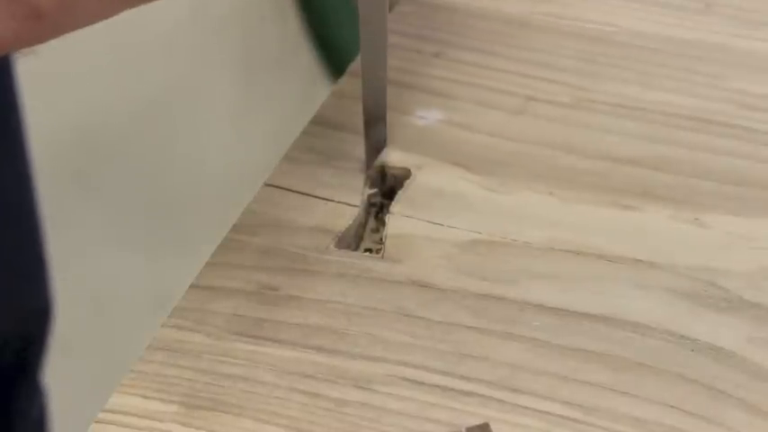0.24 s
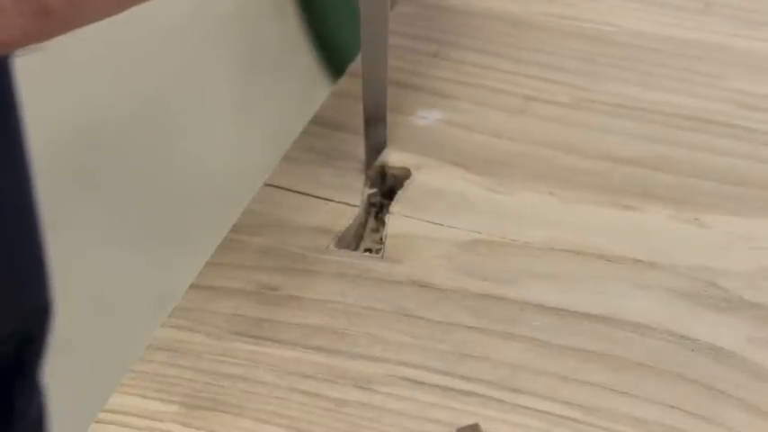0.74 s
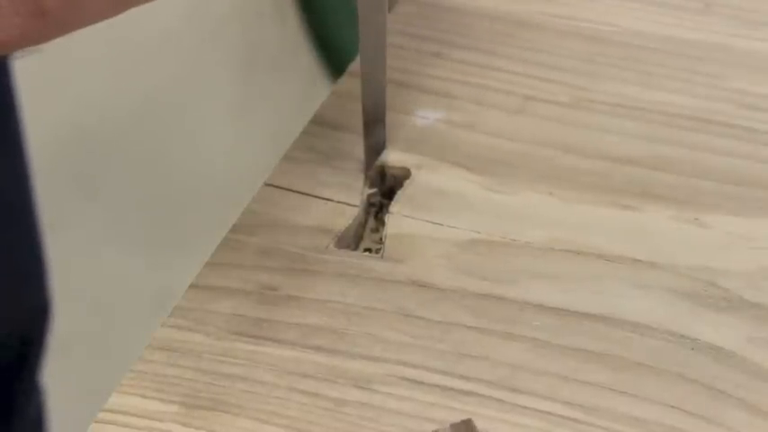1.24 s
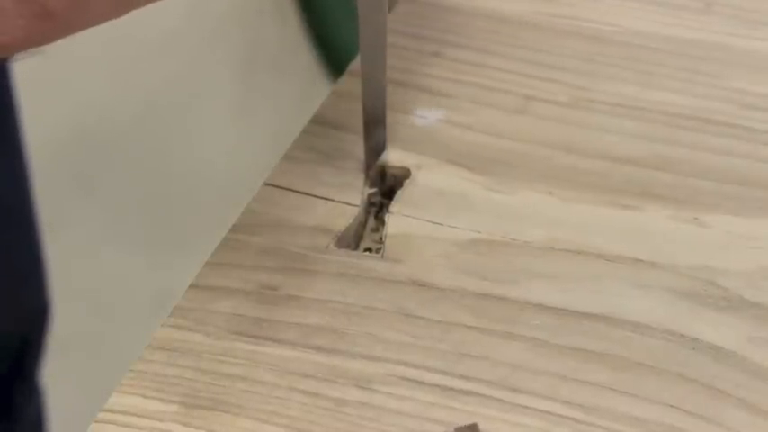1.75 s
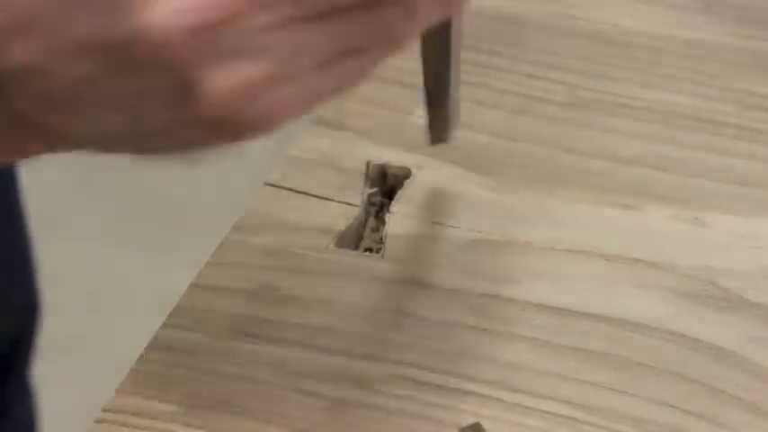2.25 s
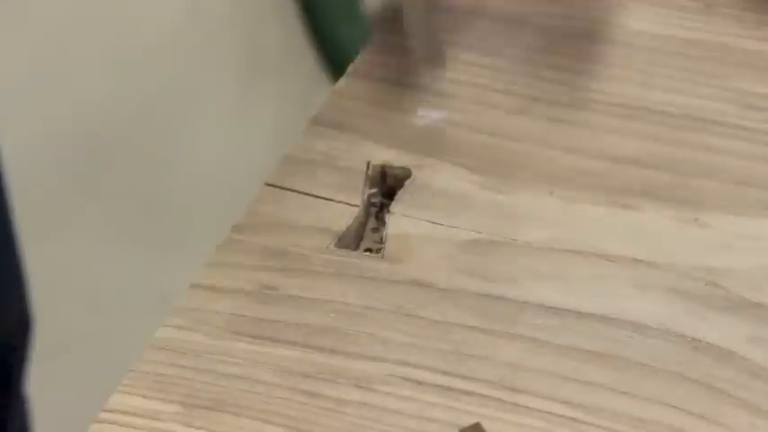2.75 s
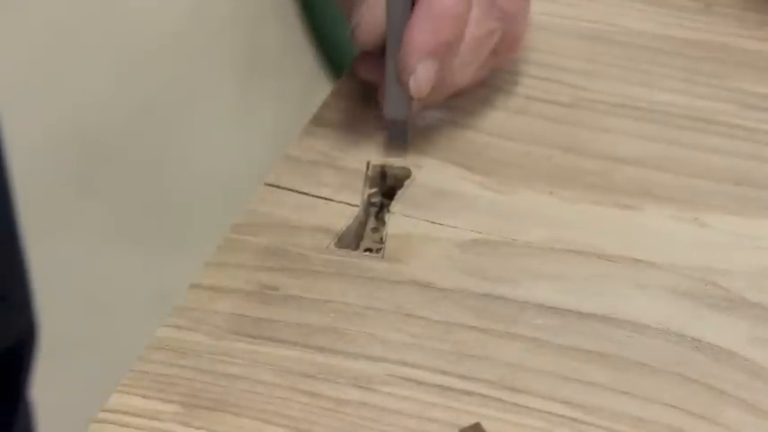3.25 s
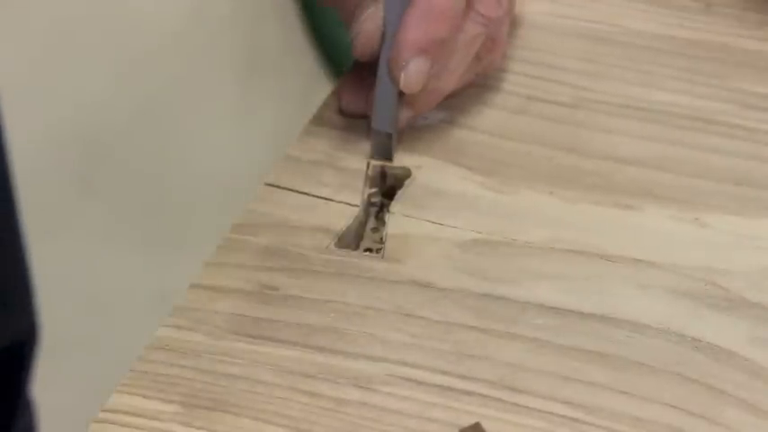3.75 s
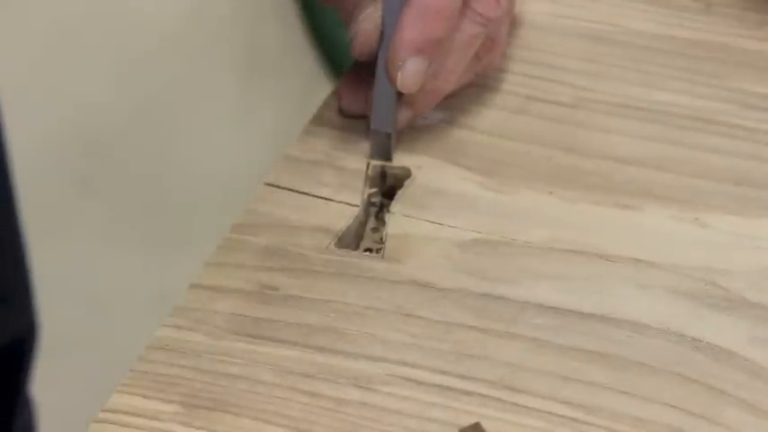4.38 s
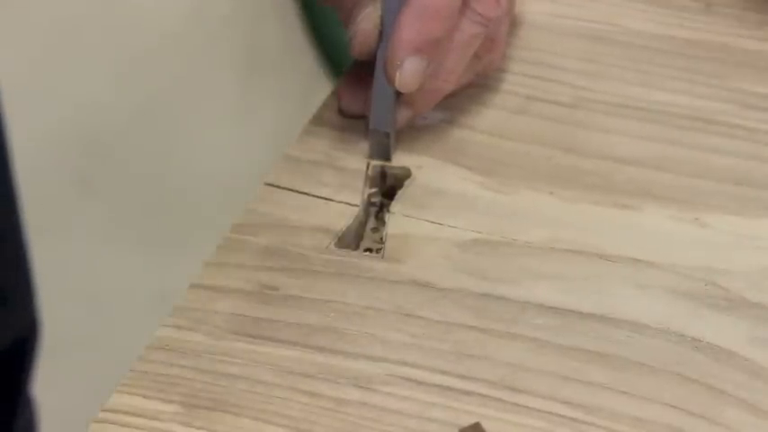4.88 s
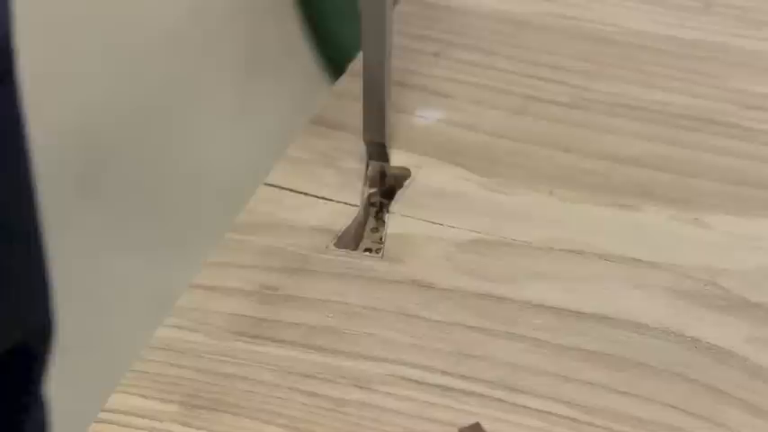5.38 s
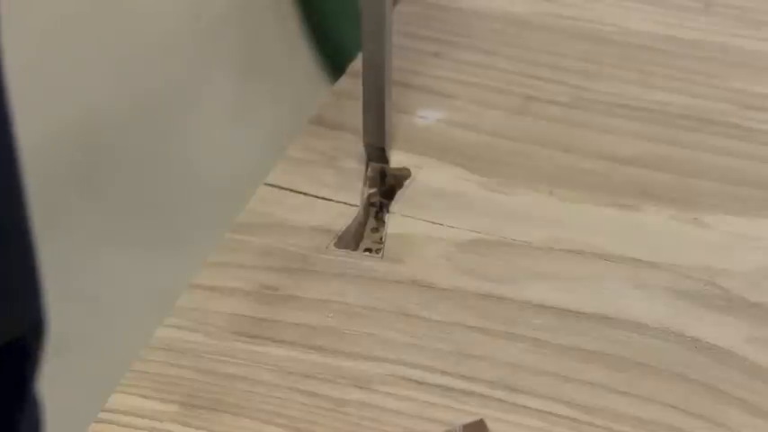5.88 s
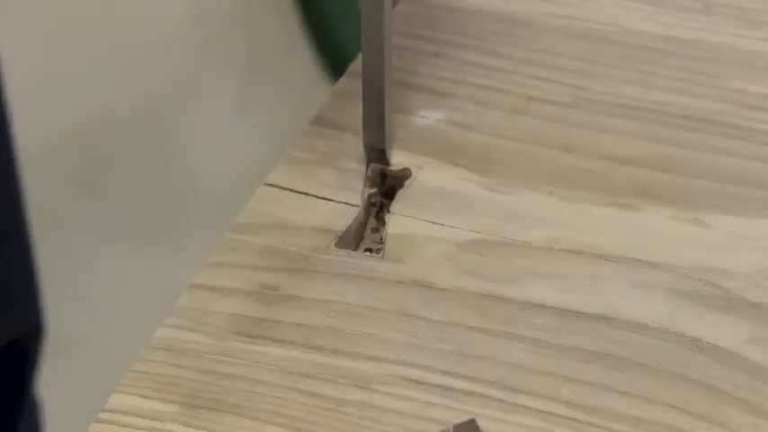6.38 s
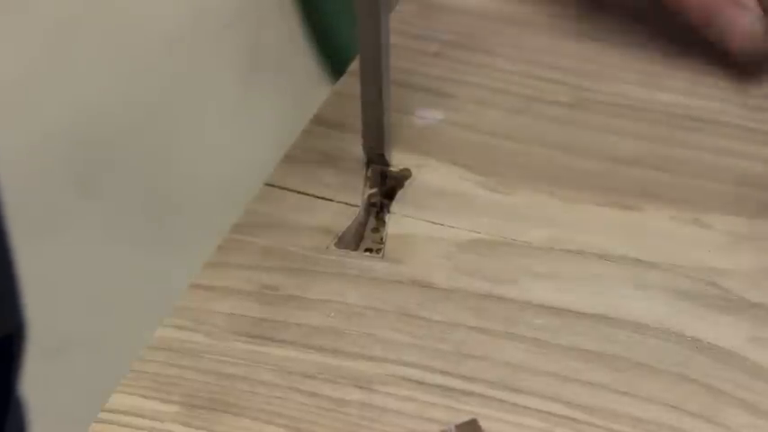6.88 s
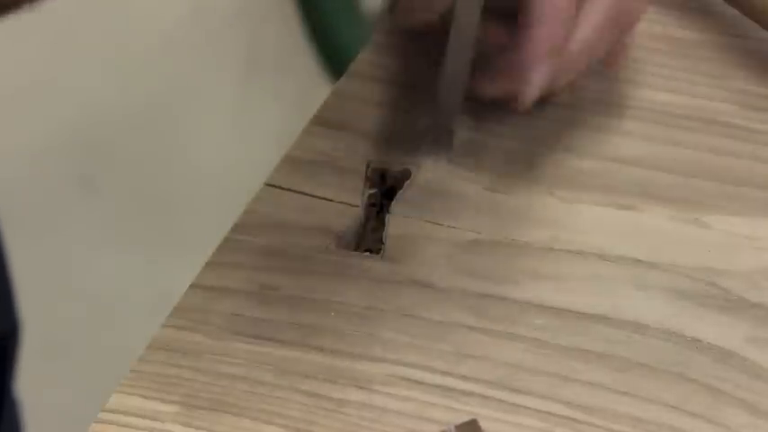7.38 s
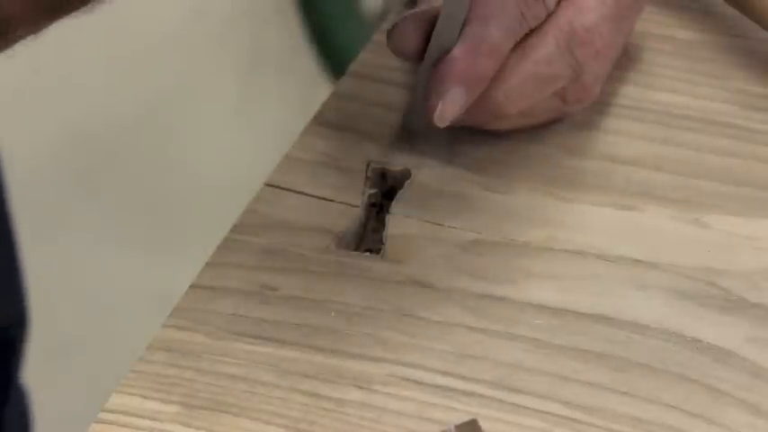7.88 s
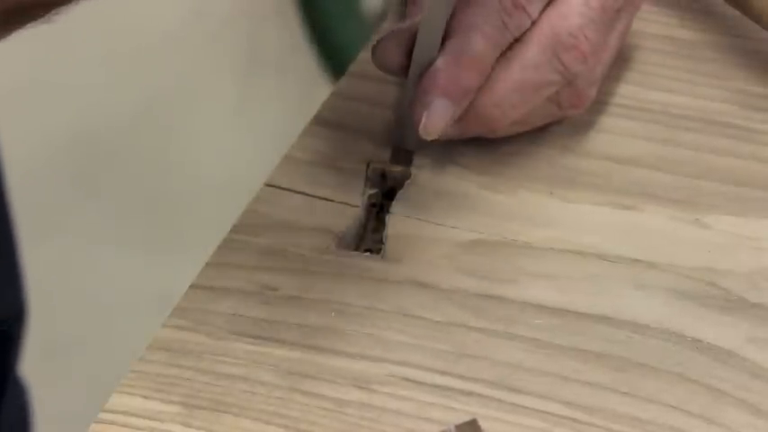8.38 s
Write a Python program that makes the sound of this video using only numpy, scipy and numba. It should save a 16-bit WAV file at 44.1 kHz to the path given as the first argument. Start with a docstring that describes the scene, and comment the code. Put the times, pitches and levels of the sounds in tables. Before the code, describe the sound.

A close microphone in a reverberant workshop, with soft low air noise and a faint steady machine hum throughout. From about 0.35 s to 1.86 s a mallet strikes a chisel six times, evenly, roughly 0.3 s apart: short, hard woody knocks with a bench thump and crackling fibres, the first weaker, then louder and tighter. Peaks overload slightly, and the background ducks and creeps back. A faint skin rub at 2.3 s, then the mallet lands on the bench with a flat clack at 2.5 s. Near 3.4 s a very soft rub and bump as the edge is set down. Three leaner, brighter blows at 5.65, 5.95 and 6.2 s, the second with more steel ring. Slight rubs at 6.6 and 6.75 s, a duller mallet drop at 6.9 s and two quieter rocking knocks by 7.1 s. At 7.5 s a soft hand slide and tiny fingernail tick, then only room noise until about 8.6 s.

```python
"""A mortise is chopped on a workbench, close to the microphone: six mallet blows on a chisel, then the mallet drops.
A hand rubs the chisel and sets its edge down; three more blows follow, and the mallet drops again and rocks.
Last, the hand slides once more and a fingernail ticks; air noise and a faint machine hum run throughout.
Damped modes and shaped noise make the blows; echoes and a noise tail make the live workshop.
The microphone's gain control reacts late, so loud attacks overload; then it ducks and creeps back."""
import sys
import numpy as np
from scipy import signal
from scipy.fft import rfft, irfft, next_fast_len
from scipy.io import wavfile
from numba import njit

SR = 44100
rng = np.random.default_rng(int(sys.argv[2]) if len(sys.argv) > 2 else 0)


def log_audio(samples):
    """Write samples as a 16-bit WAV file to the path given in sys.argv[1]."""
    # one column per channel
    frames = np.atleast_2d(samples).T
    # limit to full scale, then quantise
    limited = np.clip(frames, -1, 1)
    pcm = np.round(limited * 32767).astype(np.int16)
    wavfile.write(sys.argv[1], SR, pcm)


N = 380569


def from_db(db):
    """Decibels to gain."""
    return 10 ** (np.asarray(db) / 20)


def rms_one(x):
    """Scale to unit rms."""
    return x / np.sqrt(np.mean(x ** 2) + 1e-20)


def unit_blow(x):
    """Scale a blow so that its energy equals 20 ms at rms 1."""
    return x / np.sqrt(np.sum(x ** 2) / (SR / 50) + 1e-20)


def at_hz(points, hz):
    """Read a curve of (Hz, value) points on a log-frequency axis."""
    point_hz, value = np.transpose(points)
    return np.interp(np.log(np.maximum(hz, 1)), np.log(point_hz), value)


def low_pass(x, hz, order=2):
    """Causal Butterworth low-pass."""
    return signal.sosfilt(signal.butter(order, min(hz, SR / 2 - 1000), fs=SR, output="sos"), x)


def add(track, start_s, sound):
    """Mix a sound into a track at a time."""
    at = round(start_s * SR)
    track[..., at:at + sound.shape[-1]] += sound[..., :track.shape[-1] - at]


def coloured(spectrum, size):
    """Noise of a given spectrum, rms 1."""
    n = next_fast_len(size)
    hz = np.arange(n // 2 + 1) * SR / n
    shaped = rfft(rng.standard_normal(n)) * from_db(at_hz(spectrum, hz))
    return rms_one(irfft(shaped, n)[:size])


def burst(spectrum, t60):
    """Coloured noise that starts at once and dies away by 60 dB in t60 seconds."""
    t = np.arange(SR // 2) / SR
    return unit_blow(coloured(spectrum, len(t)) * from_db(-60 * t / t60))


def snap(spectrum, size=4096):
    """The shortest causal pulse with a given spectrum (minimum phase, from the folded cepstrum)."""
    hz = np.arange(size // 2 + 1) * SR / size
    cepstrum = irfft(np.log(from_db(at_hz(spectrum, hz))))
    cepstrum[1:size // 2] *= 2
    cepstrum[size // 2 + 1:] = 0
    pulse = irfft(np.exp(rfft(cepstrum)))
    return unit_blow(np.pad(pulse, (0, SR // 2 - size)))


def ring(modes, extra_db):
    """Damped sines; neighbouring modes start in opposite directions."""
    hz, db, t60 = np.transpose(modes)[:, :, None]
    t = np.arange(SR // 2) / SR
    sines = np.sin(2 * np.pi * hz * t) * from_db(db - 60 * t / t60)
    gains = (-1.) ** np.arange(len(modes)) * from_db(extra_db)
    return gains @ sines


def wood(modes, knock, contact_hz, bench_db, board_hz, board_db, knock_db, knock_t60,
         bench_hz=320, scatter_db=1.5, modes_far_db=-7):
    """One wooden blow as two rows: what the near microphone gets, and what goes out into the room."""
    def seating(hz):
        """Level in dB that the bench and the board's resonance add around their frequencies."""
        bench = bench_db * np.exp(-(1.1 * np.log2(hz / bench_hz)) ** 2)
        board = board_db * np.exp(-(3.5 * np.log2(hz / board_hz)) ** 2)
        return bench + board

    mode_hz = np.array(modes)[:, 0]
    body = unit_blow(ring(modes, seating(mode_hz) + scatter_db * rng.standard_normal(len(mode_hz))))
    grid_hz = np.geomspace(60, 16000, 100)
    colour = np.column_stack([grid_hz, at_hz(knock, grid_hz) + seating(grid_hz)])
    near = body + from_db(knock_db) * burst(colour, knock_t60)
    # the room takes sound from every face of the bench, so single modes stand out less there
    far = from_db(modes_far_db) * body + snap(colour)
    # a longer contact dulls both
    return np.array([unit_blow(low_pass(x, contact_hz, order=3)) for x in (near, far)])


# mallet blows on the chisel: start_s, level_db, bench_thump_db, handle_ring_db, blade_ring_db, fibre_cutoff_hz
CHISEL_BLOWS = [(0.3522, 3.5, 0.5, -22, -6, 8150), (0.6524, 8, 7, -11, -10, 8300),
                (0.964, 9.5, 7.5, -13, -13, 8000), (1.263, 10, 6.5, -15.5, -22, 9000),
                (1.567, 11.5, 5.5, -16.5, -9, 8500), (1.8626, 12, 5, -14.5, -10, 8400),
                (5.6571, 6, -5, -13, -4, 8040), (5.9404, 6.5, -5.5, -8.5, 6, 15000),
                (6.2145, 3, -2, -11.5, -10, 13620)]
# each run of blows drives one cut; at its first blow: board_resonance_hz, board_resonance_db, splitting_db
CUT_STARTS = [(1030, 5.5, -28.5), (830, 3.5, -25.5)]
# board and bench ringing together: pitch_hz, level_db, t60_s
BOARD_RING = [(180.6, -11.5, 0.12), (280, -11, 0.073), (344.3, -0.5, 0.17), (390, -10.5, .06),
              (494.2, -8.5, 0.077), (511, -3.5, 0.13), (585, -5.5, 0.076), (653, -4, 0.095),
              (710, -10.5, 0.033), (801.6, 0.5, 0.075), (943, -7, 0.23), (1039, 0, 0.04),
              (1077.5, -2.5, 0.073), (1106, -1.5, 0.069), (1264, -9, 0.096), (1319, -8, 0.074),
              (1457, -5, .07), (1510, -6, 0.11), (1706, -6, 0.073), (1814, -1, 0.031), (1990, -9.5, 0.046)]
# the board's crowded, heavily damped modes and snapping fibres: pitch_hz, level_db_per_hz
BOARD_THUD = [(60, -30), (120, -14.5), (190, -2.5), (280, -5), (430, 4), (600, -3.5), (1000, -3),
              (1500, -4.5), (2100, -6), (2500, -9), (3500, -11.5), (4400, -13), (16000, -29.5)]
# the chisel's wooden handle: pitch_hz, level_db, t60_s
HANDLE_RING = [(2080, 7.5, 0.03), (2200, 4, 0.041), (2313, -1, .04), (2870, 2.5, .04), (2977, 3.5, .04),
               (3490, 3, .025), (3648, 9, 0.028), (5100, 2.5, .008)]
# the steel blade: pitch_hz, level_db, t60_s
BLADE_RING = [(5270, -35.5, 0.19), (5320, -33.5, .24), (5500, -40.5, .12), (7600, -39, 0.098),
              (10580, -40.5, .1)]
# snapping fibres: pitch_hz, level_db_per_hz
FIBRE_CRACKLE = [(100, -31), (1500, -9.5), (3500, -2), (4400, -2.5), (5400, 1), (7000, 0), (9500, 1),
                 (12000, -3.5), (15000, -3)]
PAUSE_S = 1   # a longer rest between blows starts a new cut
# every blow takes up a share of the edge's remaining play; wedged tight, the board rings higher
# and more fibres split
WEDGE_SHARE, TIGHT_BOARD_HZ, TIGHT_SPLIT_DB = .22, 1890, 11
# a harder blow makes a shorter, brighter contact: its cut-off at 0 dB, and the level that doubles it
CONTACT_HZ, CONTACT_DOUBLING_DB = 2350, 25.5


def chisel(handle_far_db=-5.0, split_far_db=3.0):
    """Each blow rings board, handle and blade while the edge splits fibres and wedges tighter; rows near and far."""
    out = np.zeros((2, N))
    blows = np.array(CHISEL_BLOWS)
    runs = np.split(blows, np.flatnonzero(np.diff(blows[:, 0]) > PAUSE_S) + 1)
    for run, (loose_hz, board_db, loose_split_db) in zip(runs, CUT_STARTS):
        for count, (start_s, level_db, bench_db, handle_db, blade_db, split_hz) in enumerate(run):
            wedged = 1 - (1 - WEDGE_SHARE) ** count
            board_hz = loose_hz + wedged * (TIGHT_BOARD_HZ - loose_hz)
            split_db = loose_split_db + wedged * TIGHT_SPLIT_DB
            contact_hz = CONTACT_HZ * 2 ** (level_db / CONTACT_DOUBLING_DB)
            thud = wood(BOARD_RING, BOARD_THUD, contact_hz, bench_db, board_hz, board_db,
                        knock_db=-7.0, knock_t60=0.059)
            handle = unit_blow(ring(HANDLE_RING, rng.standard_normal(len(HANDLE_RING))))
            # the gripping hand shades the handle from the room
            handle = from_db([[handle_db], [handle_db + handle_far_db]]) * handle
            blade = ring(BLADE_RING, blade_db)
            # fibres crackle for a moment close by and reach the room as one crack
            fibres = np.array([burst(FIBRE_CRACKLE, t60=.016), from_db(split_far_db) * snap(FIBRE_CRACKLE)])
            split = from_db(split_db) * low_pass(fibres, split_hz, order=4)
            add(out, start_s, from_db(level_db) * (thud + handle + blade + split))
    return out


# mallet landing on the bench and rocking: start_s, level_db, contact_cutoff_hz, bench_thump_db,
# board_resonance_hz, board_resonance_db, rattle_db
MALLET_LANDINGS = [(2.5, 7.5, 3200, -4.5, 1410, -0.5, -24), (6.9205, 4, 1750, 0.5, 1390, 2.5, -54),
                   (6.992, -10, 1480, 6, 1010, 6, -34), (7.095, -16, 1180, 5.5, 774, 6.5, -30.5)]
# mallet head on the bench top: pitch_hz, level_db, t60_s
MALLET_RING = [(290, -19, 0.066), (340, -15, 0.068), (456, -11.5, 0.049), (557, -17, .06), (630, -12, 0.07),
               (739, -10.5, 0.068), (870, -11, 0.071), (926, -7, .06), (1130, -10.5, 0.032),
               (1264, -4.5, .045), (1440, 3.5, 0.026), (1628, -3.5, .04), (1933, -3, 0.017),
               (2055, -7.5, 0.067), (2350, -14.5, .03), (2800, -16, .025), (3450, -4, 0.013),
               (4900, -3.5, .02)]
# the mallet's crowded, heavily damped modes: pitch_hz, level_db_per_hz
MALLET_THUD = [(60, -34.5), (130, -22.5), (200, -6.5), (300, -5), (450, 2.5), (700, 1), (1400, 0.5),
               (1800, -2.5), (2500, -1), (3400, -9), (5000, -8.5), (7000, -24), (16000, -27)]


def mallet_dropped():
    """The mallet head lands flat on the bench, the second time rocking to rest; rows near and far."""
    out = np.zeros((2, N))
    for start_s, level_db, contact_hz, bench_db, board_hz, board_db, rattle_db in MALLET_LANDINGS:
        thud = wood(MALLET_RING, MALLET_THUD, contact_hz, bench_db, board_hz, board_db,
                    knock_db=-5.5, knock_t60=.035)
        rattle = from_db(rattle_db) * low_pass(burst(FIBRE_CRACKLE, t60=0.025), hz=4484)
        add(out, start_s, from_db(level_db) * (thud + rattle))
    return out


# the edge is set down on the board by hand: start_s, level_db
EDGE_SET_DOWNS = [(3.388, -31.5)]
# a fingernail ticks on the chisel: start_s, level_db
NAIL_TICKS = [(7.517, -47)]
# the ring of a fingernail tick: pitch_hz, level_db, t60_s
NAIL_RING = [(2310, -2, .05), (4180, -7, 0.017), (4500, -3, 0.027), (7100, -5, .015)]


def handling():
    """The edge bumps softly on the board between cuts, and a fingernail rings the chisel; rows near and far."""
    out = np.zeros((2, N))
    for start_s, level_db in EDGE_SET_DOWNS:
        bump = wood(BOARD_RING, BOARD_THUD, contact_hz=750, bench_db=8.5, board_hz=223, board_db=5,
                    knock_db=-1.5, knock_t60=0.058)
        add(out, start_s, from_db(level_db) * bump)
    for start_s, level_db in NAIL_TICKS:
        add(out, start_s, ring(NAIL_RING, level_db))
    return out


# the hand slides along the chisel to change its grip: start_s, length_s, level_db
HAND_SLIDES = [(2.29, .09, -53.5), (3.35, .25, -66.5), (6.619, .07, -58.5), (6.758, 0.095, -59),
               (7.472, 0.27, -62)]
# skin rubbing on the chisel: pitch_hz, level_db_per_hz
SKIN_COLOUR = [(100, -31.5), (1000, -12.5), (1900, -9), (2400, 7.5), (3500, 3), (4400, 2.5), (5400, -5.5),
               (7000, -4), (10000, -10.5), (16000, -15.5)]
SLIDE_ATTACK_S, SLIDE_RELEASE_T60_S = 0.038, .8


def hand_rub():
    """Skin rubs on the chisel as coloured noise: each slide swells, holds and fades."""
    t = np.arange(N) / SR
    level = np.zeros(N)
    for start_s, length_s, level_db in HAND_SLIDES:
        swell = np.clip((t - start_s) / SLIDE_ATTACK_S, 0, 1)
        fade_db = -60 * np.maximum(t - start_s - length_s, 0) / SLIDE_RELEASE_T60_S
        level += swell * from_db(level_db + fade_db)
    return level * coloured(SKIN_COLOUR, N)


# how long the workshop rings, interpolated at each band's centre: pitch_hz, t60_s
WORKSHOP_T60 = [(100, 0.64), (220, 0.4272), (600, 0.5315), (1300, 0.58), (2600, 0.5122), (6000, 0.47),
                (10000, -0.06), (16000, 0.4)]
# colour of the reverberation, before its overall level: pitch_hz, level_db
WORKSHOP_COLOUR = [(60, -12.5), (120, -5), (175, 5), (270, -1.5), (420, -0.5), (620, -1), (1200, -2),
                   (2300, -3.5), (3700, -5), (6000, -2.5), (10000, 0), (15000, -4)]
# bench top, floor and ceiling echoes: delay_s, level_db
WORKSHOP_ECHOES = [(.0068, -9), (0.0105, -6.5), (0.0248, -11.5)]


def workshop(near, far, wet_db, build_s, echo_cut_hz):
    """Direct sound, a few dull echoes and a diffuse tail that dies band by band."""
    t = np.arange(SR) / SR
    edges_hz = np.geomspace(50, 18000, 18)
    tail, echoes = np.zeros((2, SR))
    for low, high in zip(edges_hz, edges_hz[1:]):
        centre_hz = np.sqrt(low * high)
        band_filter = signal.butter(2, [low, high], "band", fs=SR, output="sos")
        band = signal.sosfilt(band_filter, rng.standard_normal(SR))
        decay_db = -60 * t / at_hz(WORKSHOP_T60, centre_hz)
        tail += band * from_db(at_hz(WORKSHOP_COLOUR, centre_hz) + decay_db)
    tail *= from_db(wet_db) * (1 - np.exp(-t / build_s))
    for delay_s, level_db in WORKSHOP_ECHOES:
        add(echoes, delay_s, from_db([level_db]))
    echoed = low_pass(signal.fftconvolve(near, echoes)[:N], echo_cut_hz)
    reverberation = signal.fftconvolve(far, tail)[:N]
    return near + echoed + reverberation


# air noise in the workshop: pitch_hz, level_db_per_hz
AIR_COLOUR = [(25, -9), (50, -2.5), (90, -2), (160, -6.5), (260, 1.5), (370, -2), (470, -3.5), (560, -5),
              (850, -5), (1300, -10.5), (2200, -17.5), (5000, -23), (10000, -28), (15500, -27)]
AIR_DB = -48   # rms
# partials of the machine hum: pitch_hz, rms_level_db
MACHINE_HUM = [(360.5, -54.5), (450.6, -55.5), (479.5, -62.5), (600, -60.5), (904, -66)]


def background(waver=0.27):
    """Air noise and a machine's hum, each partial wavering as its phase walks at random (rad per step)."""
    t = np.arange(N) / SR
    knots_s = np.linspace(0, N / SR, 40)
    hum = np.zeros(N)
    for hz, level_db in MACHINE_HUM:
        drift = np.interp(t, knots_s, np.cumsum(rng.normal(0, waver, len(knots_s))))
        hum += from_db(level_db) * np.sqrt(2) * np.sin(2 * np.pi * hz * t + drift)
    return from_db(AIR_DB) * coloured(AIR_COLOUR, N) + hum


def scene():
    """Blows and handling in the workshop, with the close hand rub, over the background."""
    near, far = chisel() + mallet_dropped() + handling()
    in_room = workshop(near, far, wet_db=-35.5, build_s=.008, echo_cut_hz=3100)
    return (in_room + hand_rub() + background())[None]


@njit
def ducking(over_db, attack, release):
    """Gain reduction in dB: it chases any excess level and falls back at a steady rate."""
    out, held = np.zeros(len(over_db)), 0.
    for i in range(len(over_db)):
        held = max(held + attack * max(over_db[i] - held, 0.) - release, 0.)
        out[i] = held
    return out


CUTOFF_HZ = 16000   # top of the microphone channel


def record(dry, threshold_db=-10.5, lag_s=0.00081, attack_s=0.0049, release_db_per_s=27.0):
    """Gain control reacts too late for the attack, so the peaks overload; then the top is cut."""
    over_db = 20 * np.log10(np.abs(dry[0]) + 1e-9) - threshold_db
    reduction_db = ducking(over_db, 1 / (attack_s * SR), release_db_per_s / SR)
    t = np.arange(N) / SR
    ducked = dry * from_db(-np.interp(t - lag_s, t, reduction_db))
    overloaded = np.clip(ducked, -1, 1)
    return signal.sosfilt(signal.ellip(10, .1, 70, CUTOFF_HZ, fs=SR, output="sos"), overloaded)


dry = scene()
out = record(dry)
log_audio(out)
```